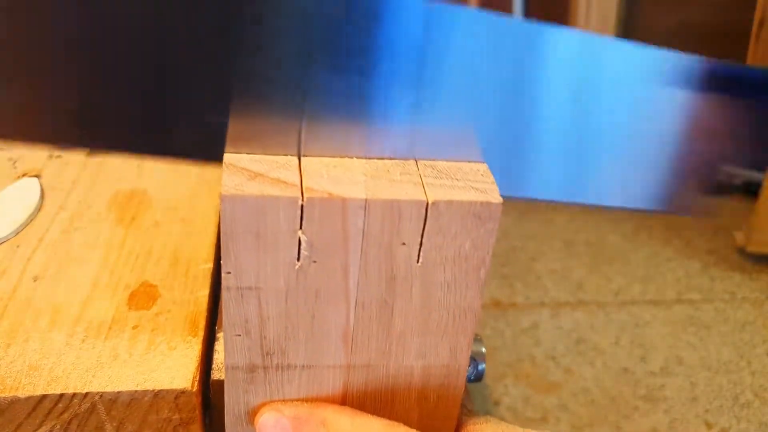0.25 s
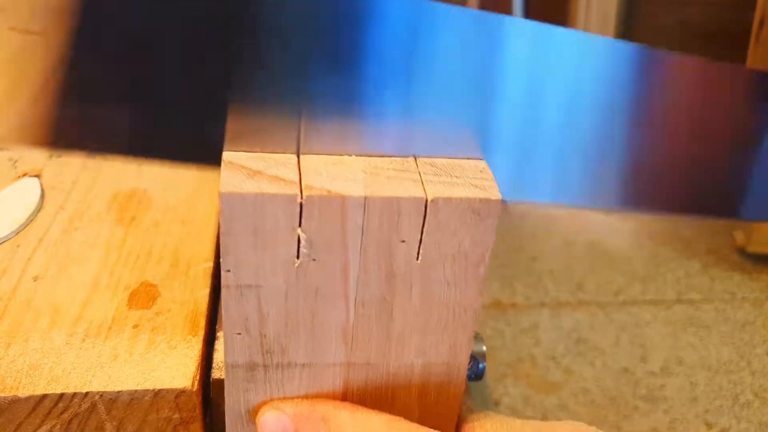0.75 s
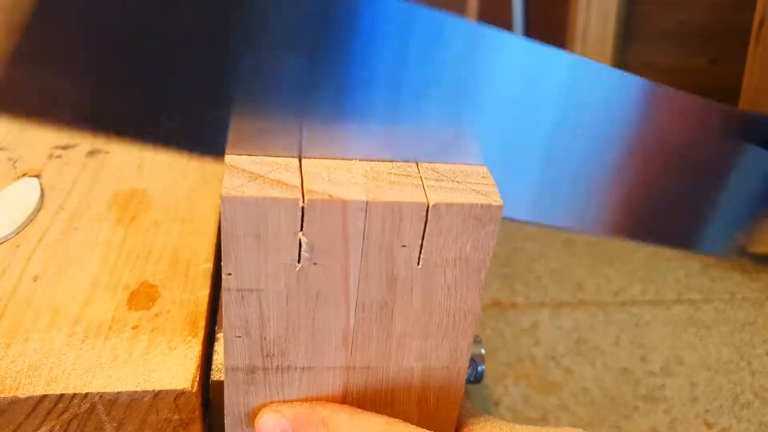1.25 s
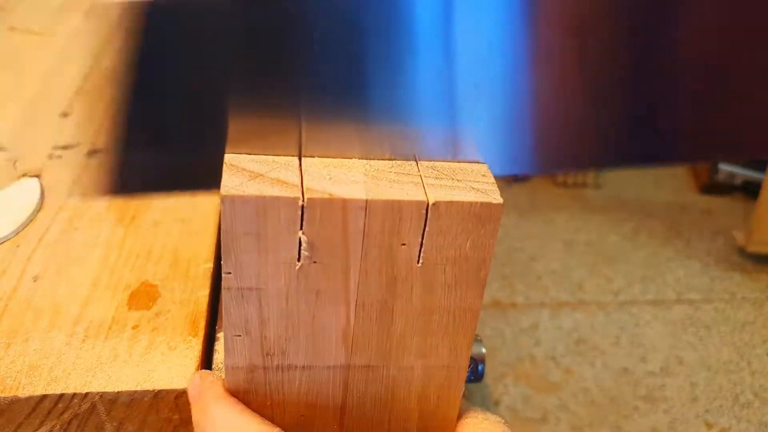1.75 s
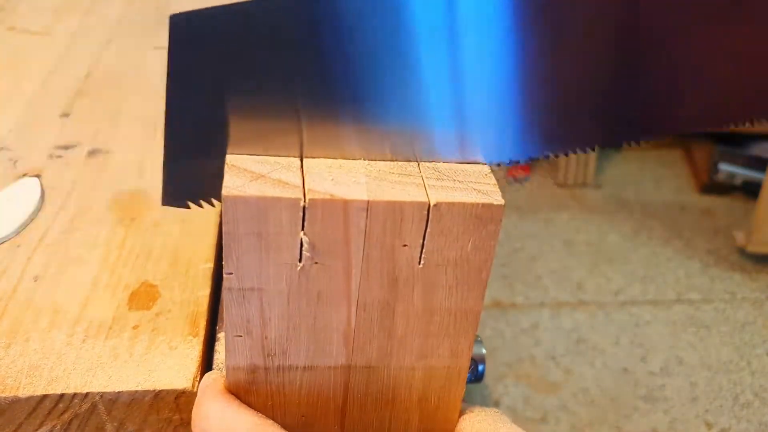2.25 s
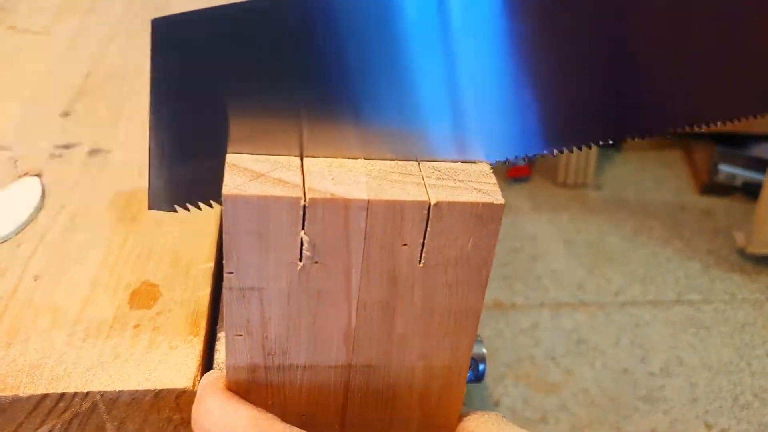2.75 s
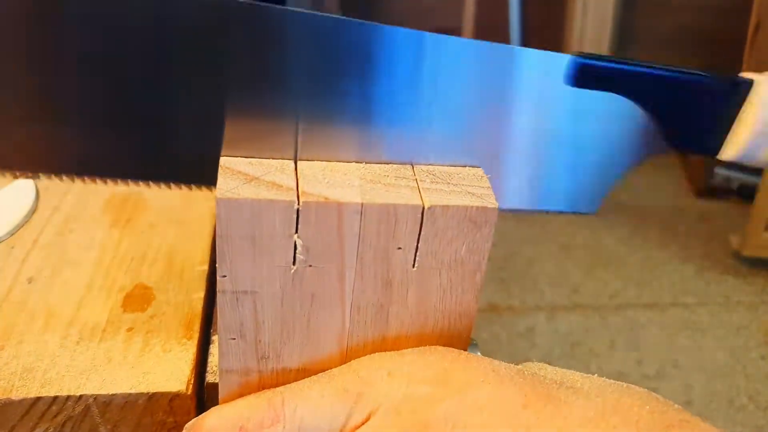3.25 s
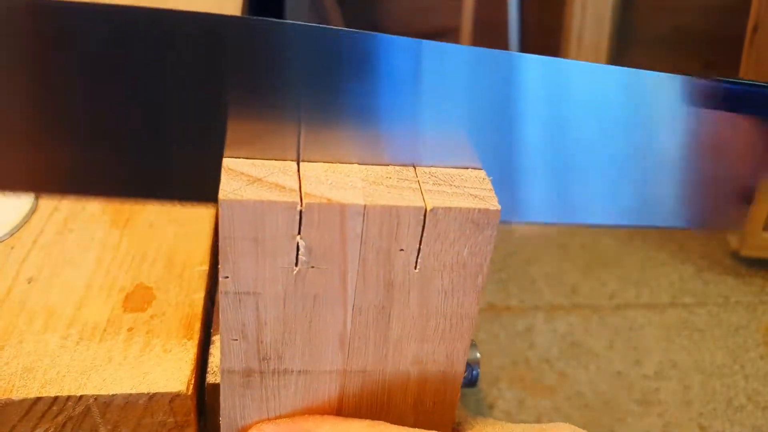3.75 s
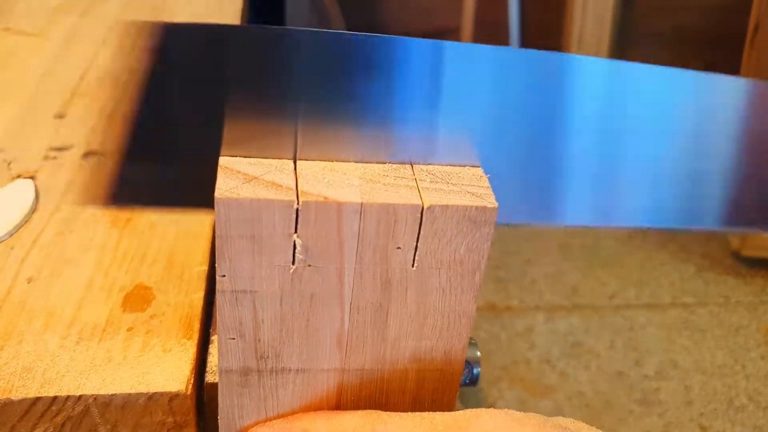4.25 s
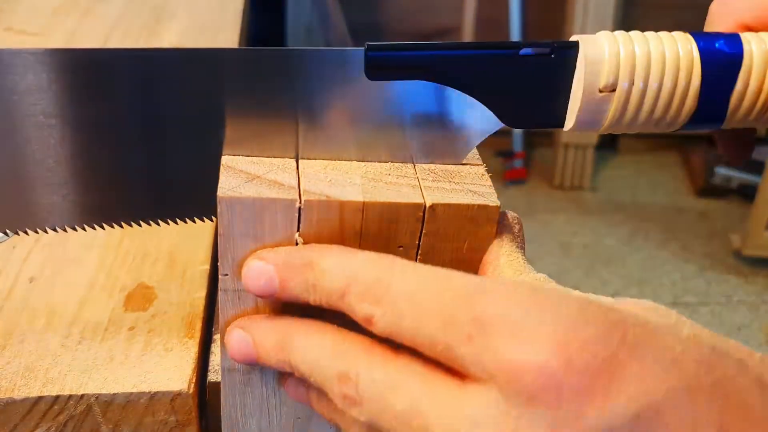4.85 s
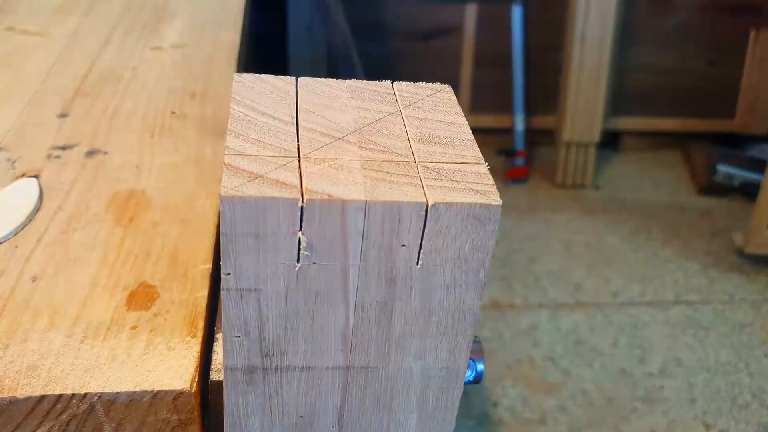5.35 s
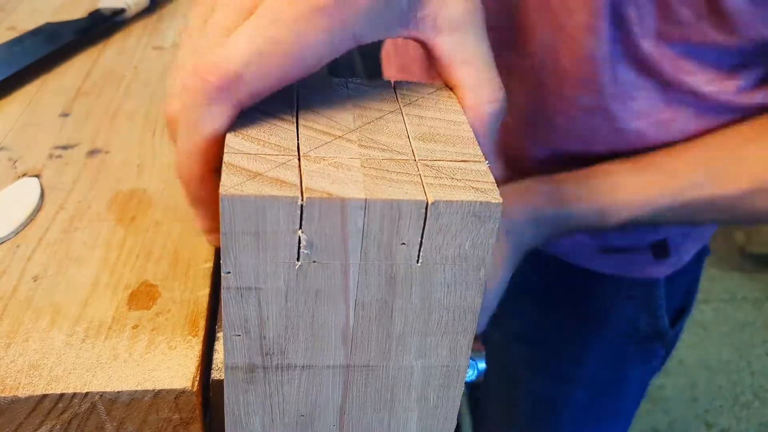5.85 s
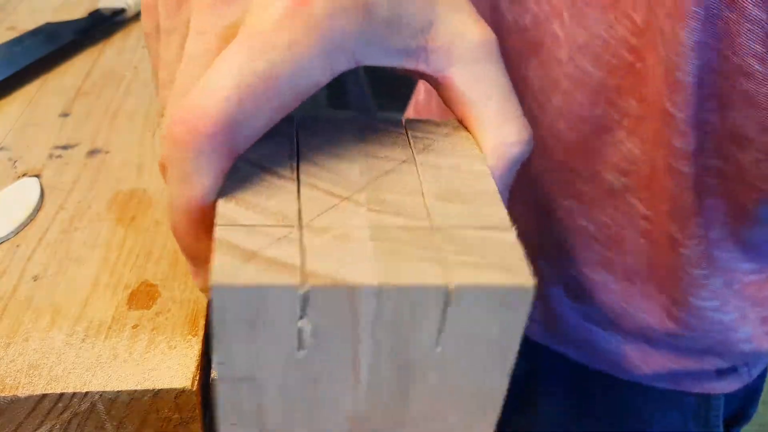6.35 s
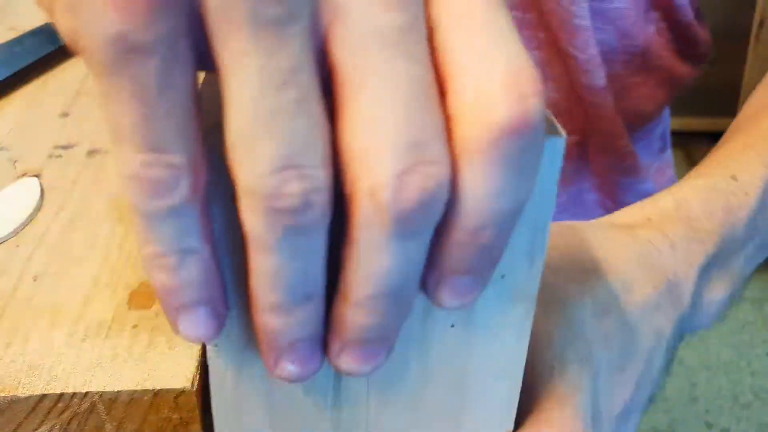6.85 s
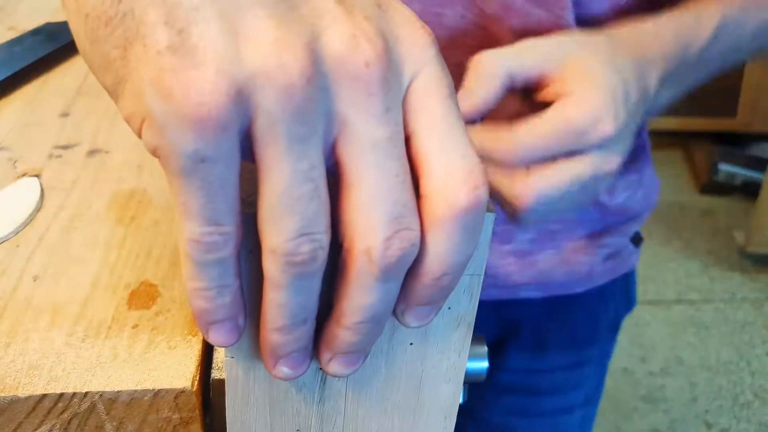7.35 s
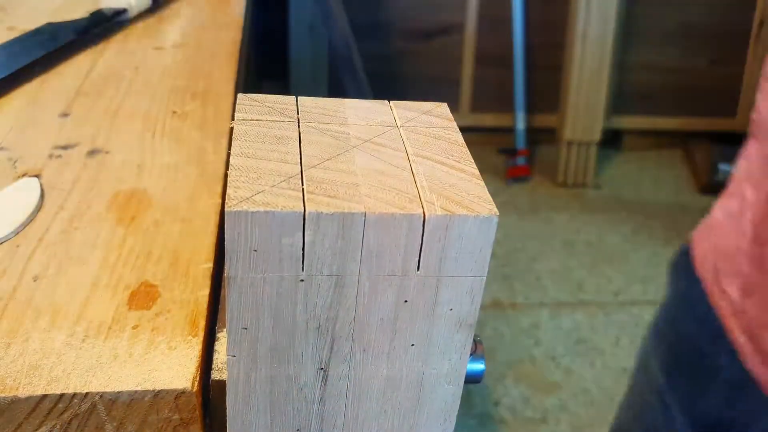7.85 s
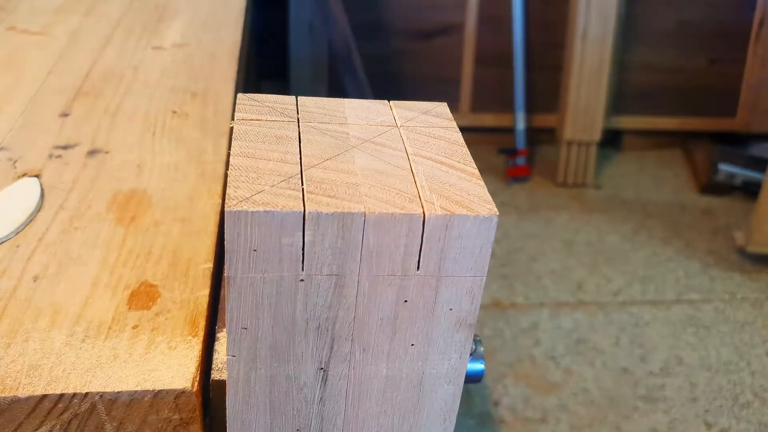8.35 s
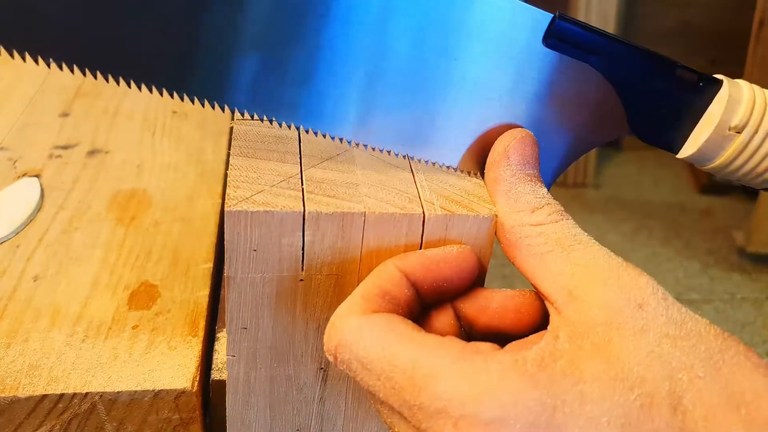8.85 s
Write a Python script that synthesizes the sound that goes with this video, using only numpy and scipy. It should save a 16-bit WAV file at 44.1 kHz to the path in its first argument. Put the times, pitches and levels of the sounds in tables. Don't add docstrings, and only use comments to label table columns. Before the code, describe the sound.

In a small workshop, a thin saw rips a clamped hardwood post at frantic speed, about twenty alternating rasps a second, with bright sizzle, woody knocks and brief blade ringing. Short gaps break the bouts. At five seconds it stops; hands loosen the clamp, squeak on timber, bump the post and drop a steel bar. Nearby machine hiss and hum fade at seven seconds, leaving near silence and ticks. Close, wide stereo, little reverberation.

```python
import sys
import numpy as np
from scipy import signal
from scipy.fft import rfft, irfft, next_fast_len
from scipy.io import wavfile
from scipy.ndimage import uniform_filter1d

SR = 44100
rng = np.random.default_rng(int(sys.argv[2]) if len(sys.argv) > 2 else 0)


def level_to_linear(level):
    exponent = np.asarray(level, float) / 20
    return 10 ** exponent


def generate_wav(sig):
    pcm = np.round(np.clip(np.atleast_2d(sig).T, -1, 1) * 32767).astype(np.int16)
    wavfile.write(sys.argv[1], SR, pcm)


N = 401310
T = np.arange(N) / SR
SIZE = next_fast_len(N + SR // 5)
HZ = np.fft.rfftfreq(SIZE, 1 / SR) + 1e-3

# frequency in Hz, level in dB per Hz.
RASP_COLOUR = [(530, -31.5), (900, 15.5), (944, 10), (1050, -6.5), (1450, -5.5), (1670, -10), (2000, -4),
               (3230, -2), (4000, 1.5), (5080, -3), (6150, -2.5), (6450, -7), (7630, -17), (10900, 0.5),
               (15600, -14.5)]
# frequency in Hz, level in dB.
SHOP_COLOUR = [(20, -6), (60, 5), (200, 0), (400, -6), (800, -8.5), (1500, -18.5), (3000, -22), (6600, -23),
               (7200, -31.5), (7900, -29.5), (9000, -23.5), (11000, -21.5), (12800, -34), (15500, -54.5)]
# frequency in Hz, width in Hz, level in dB.
BENCH_TONES = [(62, 28, -11.5), (88.7, 20, -1.5), (111, 18, -9.5), (155.6, 26, 2.5), (205, 18, -6)]
NOTCH_HZ = 7600


def shape(x, response):
    scale = np.sqrt(np.mean(np.abs(response) ** 2))
    return irfft(rfft(x, SIZE) * response / scale, SIZE)[..., :N]


def colour(points, lo_hz, hi_hz):
    hz, db = np.transpose(points)
    edges = np.sqrt((1 + (lo_hz / HZ) ** 8) * (1 + (HZ / hi_hz) ** 8))
    return level_to_linear(np.interp(np.log(HZ), np.log(hz), db)) / edges


def walk(rate):
    k = int(SR / rate)
    steps = np.repeat(rng.standard_normal((2, N // k + 1)), k, axis=1)
    return 1.54 * uniform_filter1d(uniform_filter1d(steps, k), k)[:, :N]


def ring(force, tones, vary_db, rate):
    power = sum(width * level_to_linear(db) ** 2 for _, width, db in tones) * np.pi / SR
    out = 0
    for hz, width, db in tones:
        grip = level_to_linear(db + vary_db * walk(rate)) / np.sqrt(power)
        b, a = signal.iirpeak(hz, hz / width, SR)
        out = out + signal.lfilter(b, a, force * grip)
    return out


def body(force, effort, tones, vary_db, rate, ms, tail_ms, lo_hz, hi_hz):
    edges = signal.butter(3, (lo_hz, hi_hz), "bandpass", fs=SR, output="sos")
    sound = signal.sosfilt(edges, ring(force * effort, tones, vary_db, rate))
    k = int(ms * SR / 1000)
    fade = np.exp(-1000 / (tail_ms * SR))
    due = uniform_filter1d(signal.lfilter([1 - fade], [1, -fade], effort ** 2), k)
    power = np.abs(uniform_filter1d(sound ** 2, k))
    return sound * ((due + 1e-9) / (power + 1e-9)) ** .42


def efforts(table, rise, fall, lean_db):
    rows, out = np.array(table, float), np.zeros((4, N))
    around = uniform_filter1d(rows[:, 2], size=3)
    for (mid, ms, db, *rel), mean_db in zip(rows, around):
        at = slice(max(int((mid - ms / 400) * SR), 0), int((mid + ms / 400) * SR))
        u = (T[at] - mid) * 2000 / ms
        edge_db = np.where(u < 0, rise[0] * np.abs(u) ** rise[1], fall[0] * np.abs(u) ** fall[1])
        swell_db = db - edge_db - lean_db * u * np.tanh((db - mean_db) / 3)
        out[:, at] += level_to_linear(swell_db + np.array([0, *rel])[:, None]) ** 2
    return np.sqrt(out)


def bites(rate, spread_db, smear_ms, hiss):
    snaps = (rng.random((2, N)) < rate / SR) * level_to_linear(spread_db * rng.exponential(size=(2, N)))
    age = np.arange(882) / (SR * smear_ms / 1000)
    tail = rng.standard_normal(len(age)) * age ** 2 * np.exp(-2 * age)
    smear = np.exp(1j * np.angle(rfft(tail, SIZE)))
    snaps = shape(snaps * rng.standard_normal((2, N)), smear)
    force = snaps / snaps.std() + hiss * rng.standard_normal((2, N))
    return force / force.std()


def single_notes(table, rise_s, fall_s, trim_db):
    out = np.zeros((2, N))
    for k, (s, hz, db) in enumerate(table):
        at = slice(max(int((s - 4 * rise_s) * SR), 0), int((s + 4 * fall_s) * SR))
        t = T[at] - s
        gain = level_to_linear(db + trim_db) * np.exp(-(t / np.where(t < 0, rise_s, fall_s)) ** 2 / 2)
        lead = np.array([[0], [(-1) ** k * np.pi / 2]])
        out[:, at] += gain * np.sin(2 * np.pi * hz * t + lead)
    return out


def shop():
    # time in seconds, level in dB.
    hiss_curve = [(0, -15), (1.6, -10.5), (2.42, -20), (2.54, -6), (4.3, 8.5), (4.62, 1), (4.8, 1), (5.15, -1),
                  (6.75, -0.4), (7.0, -7.5), (7.2, -15.5), (7.4, -31.5)]
    # from Hz, to Hz, still air in dB, changing hiss in dB.
    ranges = [(1300, 6400, -69.5, -43.5), (7100, 11800, -57.5, -53.5), (30, 1900, -56, -45)]
    # start in seconds, end in seconds, level in dB.
    loads = [
        (5.616, 5.73, -39),
        (5.864, 6.38, -39),
        (6.442, 6.66, -39.5),
        (6.71, 6.892, -40.5),
    ]
    # multiple of the hum pitch, level in dB.
    overtones = [(1, 2), (3, -15.5)]
    hum_hz, rise_hz_per_s = 212, 5.4
    idle_db, edge_s = -51, 0.025

    hiss_curve_db, out = np.interp(T, *np.transpose(hiss_curve)), 0
    for lo_hz, hi_hz, still_db, changing_db in ranges:
        flicker = level_to_linear(0.66 * walk(25) + 2.13 * walk(5.5))
        gain = np.hypot(level_to_linear(still_db), level_to_linear(changing_db + hiss_curve_db)) * flicker
        out = out + shape(rng.standard_normal((2, N)) * gain, colour(SHOP_COLOUR, lo_hz, hi_hz))
    load = level_to_linear(idle_db) * ((T > loads[0][0]) & (T < loads[-1][1]))
    for start, end, db in loads:
        load = load + level_to_linear(db) * np.clip(np.minimum(T - start, end - T) / edge_s, 0, 1)
    t = T - loads[1][0]
    turn = 2 * np.pi * (hum_hz + rise_hz_per_s * t / 2) * t
    turn = turn + .3 * walk(10) + np.array([[0], [1.6]])
    hum = sum(level_to_linear(db) * np.sin(k * turn) for k, db in overtones)
    return out + load * hum


def clink():
    # frequency in Hz, level in dB, time to fall 60 dB in seconds.
    bar = [(4091, -14, .06), (6790, -3, 0.035), (8086, -16, 0.022), (10160, -2, 0.035), (11210, 0, 0.05),
           (14020, -19, 0.04)]
    t = np.clip(T - 6.561, 0, None)
    start = 2 * np.pi * rng.random(len(bar))[:, None, None] + np.array([[0], [np.pi / 2]])
    tones = 0
    for (hz, db, t60), phase in zip(bar, start):
        tones = tones + level_to_linear(db - 60 * t / t60) * np.sin(2 * np.pi * hz * t + phase)
    return level_to_linear(-9.5) * tones * (1 - np.exp(-(t / 0.006) ** 2))


def squeaks():
    # start in seconds, end in seconds, from Hz, to Hz, level in dB.
    rubs = [
        (5.317, 5.402, 1443, 1150, -27),
        (5.919, 5.958, 1300, 994, -29.5),
        (6.133, 6.187, 1050, 930, -31.5),
        (8.033, 8.085, 1493, 1300, -49),
        (8.283, 8.467, 2980, 4160, -61),
        (6.746, 6.853, 1908, 2994, -35.5),
    ]
    # start in seconds, end in seconds, from Hz, to Hz, level in dB.
    squeals = [
        (5.326, 5.377, 3650, 3600, -33),
        (6.623, 6.663, 3900, 3530, -34),
        (6.658, 6.7, 3310, 2930, -35.5),
        (7.744, 7.829, 4640, 5010, -53),
    ]
    # start in seconds, end in seconds, from Hz, to Hz, level in dB.
    chirps = [
        (8.525, 8.562, 12700, 12150, -63.5),
        (8.55, 8.582, 13300, 13600, -59),
        (8.568, 8.59, 11700, 11400, -62),
        (8.578, 8.606, 14000, 12900, -60),
        (8.604, 8.636, 12650, 13400, -55),
        (8.608, 8.645, 15520, 15700, -63),
        (8.638, 8.662, 10900, 10600, -62),
    ]

    out, chance = np.zeros((2, N)), rng.standard_normal((2, 2, N))
    for table, spread in [(rubs, 0.91), (squeals, 0.17), (chirps, 0.012)]:
        for start, end, from_hz, to_hz, db in table:
            at = slice(int(start * SR), int(end * SR))
            u = (T[at] - start) / (end - start)
            turn = 2 * np.pi * np.cumsum(from_hz + (to_hz - from_hz) * u) / SR
            k = int(SR / (spread * from_hz))
            a, b = uniform_filter1d(uniform_filter1d(chance[..., at], k), k) * np.sqrt(k)
            out[:, at] += level_to_linear(db) * np.sin(np.pi * u) * (a * np.cos(turn) + b * np.sin(turn))
    return out


def touches(table, bench_db, bench_slope, sizzle_db, sizzle_slope):
    return [(*row, bench_db + bench_slope * row[3], sizzle_db + sizzle_slope * row[3]) for row in table]


def handling():
    # middle in seconds, length in ms, scuff in dB, thud over scuff in dB.
    knocks = [
        (5.374, 46, -39, 5),
        (5.841, 18, -30.5, -4.5),
        (5.929, 34, -40, 8.5),
        (7.611, 37, -57.5, 10.5),
        (7.925, 45, -37.5, -6),
    ]
    ticks = [
        (5.23, 35, -48, 6),
        (5.339, 35, -43, 12),
        (5.595, 38, -36, -13),
        (5.963, 13, -45.5, 11),
        (5.978, 12, -35.5, -16),
        (7.08, 10, -46, -2),
        (9.042, 20, -46, 10.5),
        (9.066, 23, -35.5, 6),
        (9.1, 15, -38, 3),
    ]
    bumps = [(5.654, 30, -46.5, 12.5), (5.688, 32, -50.5, 16.5), (6.154, 36, -44, 10),
             (6.41, 94, -55.5, 12.5), (6.462, 29, -57.5, 20.5), (6.571, 37, -36, 9.5),
             (6.889, 32, -41.5, 8), (6.946, 14, -49.5, 15), (7.124, 30.4, -37, 16), (7.272, 35, -52, 10),
             (7.745, 28, -54.5, 0), (8.197, 32, -61, -5.5), (8.846, 54, -71.5, 10)]
    swishes = [(6.665, 74, -48, -4), (6.79, 110, -45.5, -0.5), (7.05, 84, -54.5, 5.5),
               (7.5, 148, -67.5, -6), (7.79, 48, -55, -6), (7.88, 99, -49.5, 0), (8.045, 15, -54.5, 4.5),
               (8.085, 91, -53.5, -2.5), (8.18, 70, -66.5, 5.5), (8.32, 100, -57, -11),
               (8.43, 100, -56, -7.5), (8.57, 83, -57.5, 1), (8.645, 62, -54.5, 1.5),
               (9.0, 84.8, -74.5, 10.5)]
    # frequency in Hz, level in dB per Hz.
    blow_colour = [(1000, 1.5), (2000, -3), (3500, -3), (6500, -11.5), (7300, -26.5), (9000, -38)]
    # frequency in Hz, width in Hz, level in dB.
    loose_post = [(280, 85, 2), (410, 180, 8), (540, 140, 0.5), (675, 36, 4), (860, 120, 4),
                  (1050, 140, -20), (1277, 150, -36)]
    grip_db = 3.5

    hits = touches(knocks, -10, 0.36, -8.5, 0.26) + touches(ticks, -4, 0.5, 3.5, 0.47)
    hits = hits + touches(bumps, -2, 0.93, 1, -0.82)
    blows = efforts(sorted(hits), rise=(11., 2.8), fall=(7., 1.4), lean_db=0.0)
    brush = efforts(touches(swishes, -5.5, 2.5, 2, -0.5), rise=(5., 4.5), fall=(5., 3.5), lean_db=1.5)
    _, post, bench, sizzle = np.hypot(blows, brush)
    touch = bites(1500, spread_db=2., smear_ms=4., hiss=1.)
    out = level_to_linear(1.5) * shape(touch * blows[0], colour(blow_colour, 1050, 9000))
    out += level_to_linear(1.5) * shape(touch * brush[0], colour(SHOP_COLOUR, 1300, 5900))
    out += level_to_linear(-4.0) * shape(touch * sizzle, colour(RASP_COLOUR, NOTCH_HZ, 11500))
    out += body(touch, post, loose_post, vary_db=grip_db, rate=9.8, ms=16.0, tail_ms=1.1, lo_hz=223, hi_hz=1205)
    return out + level_to_linear(3.0) * body(touch, bench, BENCH_TONES, vary_db=grip_db, rate=7.7, ms=47, tail_ms=4.4,
                                 lo_hz=39.5, hi_hz=264)


def thumps():
    # peak in seconds, frequency in Hz, level in dB.
    booms = [(0.026, 159, -25.5), (0.329, 156, -15.5), (0.782, 92, -24), (0.786, 167, -26),
             (0.876, 108, -28), (0.89, 150, -29.5), (1.1, 91, -21.5), (1.119, 138, -22), (1.235, 102, -26),
             (1.474, 97, -35.5), (1.706, 177, -25), (1.71, 91, -13), (1.837, 145, -27), (1.927, 81, -23),
             (1.938, 151, -29.5), (1.938, 235, -21.5), (1.998, 209, -33), (2.039, 81, -21.5),
             (2.163, 97, -19.5), (2.252, 205, -23.5), (2.252, 97, -18), (2.454, 160, -30),
             (2.458, 93, -19.5), (2.69, 75, -18), (2.705, 156, -19), (2.743, 210, -26), (2.761, 92, -25),
             (2.941, 229, -10.5), (2.941, 65.4, -13), (3.218, 158, -17), (3.307, 139, -26),
             (3.397, 156, -22.5), (3.468, 156, -26), (3.629, 178, -32), (3.708, 228, -27),
             (3.936, 221, -29), (4.378, 148, -22), (4.396, 65, -26.5), (4.475, 205, -24),
             (4.516, 92, -24.5), (4.763, 108, -23.5), (4.995, 93.5, -20), (5.036, 75, -25),
             (5.077, 253, -25.5), (5.085, 87, -14.5)]
    post_notes = [(0.015, 448, -18), (0.095, 355, -23.5), (0.337, 347, -19), (0.377, 455, -20),
                  (0.484, 425, -19.5), (0.509, 348, -9), (0.659, 354, -18.5), (0.703, 465, -20.5),
                  (0.768, 460, -15), (1.01, 455, -19.5), (1.058, 500, -22.5), (1.105, 444, -12.5),
                  (1.362, 457, -24), (1.469, 450, -14), (1.469, 716, -18), (1.699, 351, -15),
                  (1.701, 444, -14), (1.831, 445, -17), (1.891, 397, -18), (1.938, 694, -11.5),
                  (1.938, 467, -17), (2.06, 463, -20.5), (2.105, 395, -22.5), (2.145, 446, -19.5),
                  (2.205, 410, -18), (2.247, 310, -16.5), (2.262, 444, -27), (2.467, 477, -23),
                  (2.716, 696, -21), (2.724, 423, -9), (2.946, 452, -4), (3.305, 338, -17),
                  (3.37, 350, -20), (3.395, 449, -16.5), (3.395, 680, -17.5), (3.437, 366, -16.5),
                  (3.477, 452, -10), (3.562, 432, -12.5), (3.599, 375, -17.5), (3.682, 368, -16),
                  (3.704, 656, -15), (3.796, 447, -21), (4.103, 448, -15), (4.19, 447, -18.5),
                  (4.208, 547, -16.5), (4.966, 440, -14.5), (5.071, 443, -17), (5.113, 440, -17.5)]
    jolt_notes = [(5.33, 458, -36), (5.332, 1017, -28), (5.334, 870, -30), (5.361, 1440, -27),
                  (5.375, 587, -29.5), (5.66, 219, -27), (5.689, 484, -33), (5.924, 1240, -28),
                  (5.928, 483, -31), (5.957, 610, -36), (6.151, 942, -32), (6.151, 269, -30),
                  (6.162, 97, -32), (6.407, 118, -35), (6.453, 97, -33), (6.564, 700, -30),
                  (6.57, 393, -17), (6.578, 81, -46), (6.583, 211, -17), (6.888, 189, -28),
                  (6.89, 424, -31), (6.948, 98, -22.5), (7.08, 86, -30), (7.119, 940, -32),
                  (7.121, 690, -23), (7.121, 573, -21.5), (7.129, 130, -22), (7.138, 205, -16.5),
                  (9.061, 294, -28.5), (9.065, 464, -41), (9.073, 65, -33),
                  (7.262, 81, -37), (7.7, 74, -48), (8.03, 86, -48), (8.68, 113, -43), (0.016, 284, -16.5),
              (7.285, 990, -45.5), (7.225, 90, -43), (7.61, 700, -54), (8.05, 850, -54), (8.79, 80, -47.5),
              (8.72, 65, -45), (4.745, 440, -25), (4.76, 56, -22.5)]
    blade_notes = [
        (1.026, 4118, -19.5),
        (1.104, 4110, -6.5),
        (1.224, 4070, -20.5),
        (1.356, 4130, -16.5),
        (1.459, 4060, -19),
        (2.035, 5940, -17),
        (2.14, 4054, -26),
        (3.704, 3252, -23),
    ]
    cracks = [
        (5.685, 480, -16.5),
        (5.925, 750, -25),
        (6.154, 600, -30),
        (6.568, 520, -9.5),
        (6.886, 300, -15.5),
        (7.119, 450, -13),
        (7.268, 900, -34),
    ]

    out = single_notes(booms, rise_s=0.011, fall_s=0.01, trim_db=2.9)
    out += single_notes(post_notes, rise_s=0.0084, fall_s=0.0078, trim_db=1.5)
    out += single_notes(jolt_notes, rise_s=0.0053, fall_s=0.008, trim_db=1.7)
    out += single_notes(blade_notes, rise_s=0.0058, fall_s=0.009, trim_db=-0.5) * level_to_linear(5 * walk(300) - 2.0)
    return out + single_notes(cracks, rise_s=0.00073, fall_s=0.00056, trim_db=0.1)


def strokes():
    # turn in seconds, cut in dB (-80 is a rest), post shake over cut in dB.
    first_bout = [(0.0, -14, -2.5), (0.052, -20, -0.5), (0.101, -20.5, -7.5), (0.151, -80, 0),
                  (0.253, -23.5, 0.5), (0.292, -15.5, -2), (0.357, -19.5, 0), (0.401, -14, -6.5),
                  (0.465, -20, 6), (0.516, -14.5, -4.5), (0.577, -19.5, 1.5), (0.629, -14.5, -9.5),
                  (0.685, -19.5, 0), (0.74, -14, -4.5), (0.796, -22, -4.5), (0.845, -16, -8.5),
                  (0.907, -22, -9), (0.973, -17.5, -5), (1.04, -20, 2), (1.081, -16, 0.5),
                  (1.14, -25.5, -1.5), (1.188, -21, -3), (1.248, -26.5, -4), (1.319, -16, -4),
                  (1.378, -22, 3.5), (1.429, -17.5, 1), (1.487, -26, 2.5), (1.543, -80, 0)]
    tilted_bout = [(1.61, -45.5, 5), (1.68, -18.5, -1), (1.747, -24.5, 3.5), (1.801, -19, 0.5),
                   (1.857, -23, 6.5), (1.907, -16.5, 2.5), (1.962, -27.5, 10.5), (2.017, -18.5, -1),
                   (2.071, -21.5, 3.5), (2.12, -16.5, 1.5), (2.179, -25.5, 7.5), (2.227, -18.5, 3.5),
                   (2.287, -28, 6.5), (2.354, -80, 0), (2.428, -23, 5), (2.505, -80, 0), (2.554, -31.5, 7),
                   (2.64, -80, 0), (2.669, -21.5, 7.5), (2.772, -80, 0), (2.796, -29.5, -0.5),
                   (2.886, -80, 0), (2.915, -24.5, 17), (2.941, -22, 8), (3.012, -80, 0)]
    quick_bout = [(3.057, -26.5, -5), (3.11, -17.5, 0), (3.155, -20, -1), (3.191, -17.5, -1),
                  (3.244, -19.5, -3), (3.28, -17, 2), (3.332, -19, 3), (3.361, -16.5, -2.5),
                  (3.413, -20, -2.5), (3.448, -16, 3.5), (3.496, -18, 1.5), (3.531, -16, 0.5),
                  (3.579, -19, -0.5), (3.606, -17, 0.5), (3.652, -19.5, 4.5), (3.687, -15, -6.5),
                  (3.729, -22.5, 6), (3.765, -17.5, -2), (3.81, -22, -1), (3.838, -17.5, -0.5)]
    slow_bout = [(3.886, -27.5, 4.5), (3.965, -24.5, 5.5), (4.07, -24, 2.5), (4.153, -19.5, 1),
                 (4.246, -23, 1), (4.336, -27.5, 5), (4.452, -23.5, 1.5), (4.553, -80, 0),
                 (4.637, -30.5, 4), (4.796, -80, 0), (4.926, -27, 7.5), (5.001, -28, 6.5),
                 (5.055, -20, 0.5), (5.135, -80, 0)]
    # time in seconds, bench over cut in dB.
    slack = [(0, -10.5), (1.5, -8), (1.66, -4.5), (2.2, -7), (3.02, -1.5), (3.06, -9), (3.8, -10),
             (4.3, -13), (4.4, -7.5), (5.1, -2)]
    rest_db, catch_s = -70, 0.0042

    turn, cut_db, shake_db = np.transpose([*first_bout, *tilted_bout, *quick_bout, *slow_bout])
    turn[1:] -= catch_s * (cut_db[:-1] < rest_db)
    cutting = cut_db[:-1] > rest_db
    mid = ((turn[1:] + turn[:-1]) / 2)[cutting]
    ms = np.diff(turn)[cutting] * 1000
    cut_db, shake_db = cut_db[:-1][cutting], shake_db[:-1][cutting]
    pull = cut_db > uniform_filter1d(cut_db, size=3)
    bench_db = np.interp(mid, *np.transpose(slack)) + 0.44 * shake_db
    fill = np.where(pull, 0.94, 1)
    sizzle_db = np.where(pull, -0.75, -3.5)
    return np.transpose([mid, ms * fill, cut_db, shake_db, bench_db, sizzle_db])


def saw():
    # time in seconds, level in dB.
    singing = [(0, -21.5), (.95, -8), (1.1, -6.5), (1.4, -13.5), (1.7, -15), (3.7, -5), (5.2, -9.5)]
    # middle in seconds, length in ms, level in dB.
    surges = [(0.99, 14, -23), (1.098, 21, -14.5), (1.203, 15, -22), (1.988, 14, -23.5), (2.032, 11, -21),
              (2.136, 14, -17.5), (3.7, 12, -17), (4.17, 10, -21.5), (4.355, 15, -23.5), (4.04, 33, -20),
              (4.52, 29, -27.5), (2.942, 28, -25), (4.455, 36, -31), (5.0, 23, -25.5), (5.05, 20, -29.5)]
    # frequency in Hz, width in Hz, level in dB.
    blade_tones = [(2060, 40, -4), (2750, 74, -5.5), (3760, 40, -17), (4146, 75, 4.5), (4740, 110, 0.5),
                   (5510, 100, 5), (6310, 240, 0.5)]
    # frequency in Hz, width in Hz, level in dB.
    post_tones = [(270, 160, -31), (362, 61, 4), (449, 45, 10.5), (540, 72, -9), (683, 52, 1.5)]

    rows = strokes()
    rasp, post, bench, _ = efforts(rows, rise=(14., 3.3), fall=(15., 3.6), lean_db=1.65)
    sizzle = efforts(rows, rise=(15., 2.6), fall=(20., 3.8), lean_db=0.6)[-1]
    surge = efforts([(*row, 0, 0, 0) for row in surges], rise=(9., 1.9), fall=(9., 1.8), lean_db=1)[0]
    rasp, sizzle = np.hypot(rasp, surge), np.hypot(sizzle, surge)
    teeth = bites(1800, spread_db=2.0, smear_ms=2.6, hiss=1.3)
    patches = [(hz, hz / 13, -10 * np.log10(hz)) for hz in 1100 * 1.15 ** np.arange(20)]
    torn = ring(teeth, patches, vary_db=4., rate=30)
    torn /= torn.std()
    sing = level_to_linear(np.interp(T, *np.transpose(singing)))
    out = level_to_linear(-3.0) * shape(torn * rasp, colour(RASP_COLOUR, 1150, NOTCH_HZ))
    out += shape(torn * sizzle, colour(RASP_COLOUR, NOTCH_HZ, 15210))
    out += level_to_linear(-2.) * ring(teeth * rasp * sing, blade_tones, vary_db=4., rate=12)
    out += level_to_linear(-2.0) * body(teeth, post, post_tones, vary_db=6.0, rate=16, ms=24, tail_ms=4.8,
                            lo_hz=248.0, hi_hz=1150)
    return out + level_to_linear(-3.0) * body(teeth, bench, BENCH_TONES, vary_db=10.0, rate=15, ms=21, tail_ms=3.3,
                                  lo_hz=43.75, hi_hz=244.0)


def scene():
    near = clink() + squeaks() + handling() + thumps() + saw()
    t = np.arange(SR // 4) / SR
    walls = rng.standard_normal((2, len(t))) * level_to_linear(-60 * t / 0.16)
    wash = signal.fftconvolve(near, walls / np.linalg.norm(walls[0]), axes=1)[:, :N]
    return near + level_to_linear(-15.0) * wash + shop()


def roll_off(x):
    return signal.sosfilt(signal.butter(12, 15760, fs=SR, output="sos"), x)


def record(dry):
    # frequency in Hz, left minus right in dB.
    port_colour = [(60, -4), (110, 0.5), (200, -2), (450, -6.5), (900, -3.5), (1300, -0.5), (2000, 0),
                   (3350, -3.5), (4100, -2), (5100, -1.5), (6350, 12.5), (7500, -9), (8000, 4.5),
                   (9200, -4.5), (10000, -1.5), (12500, -7.5), (14200, -4), (15500, -15)]
    # frequency in Hz, width in Hz, level in dB.
    case_dips = [(7270, 300, -3), (7840, 200, -4)]
    hz, db = np.transpose(port_colour)
    tilt = level_to_linear(np.interp(np.log(HZ), np.log(hz), db) / 2)
    dips = level_to_linear(sum(dip_db * np.exp(-((HZ - at_hz) / width) ** 2) for at_hz, width, dip_db in case_dips))
    ports = irfft(rfft(dry, SIZE) * dips * np.array([tilt, 1 / tilt]), SIZE)[:, :N]
    return roll_off(0.97 * np.tanh(ports / 1.106))


dry = scene()
out = record(dry)
generate_wav(out)
```